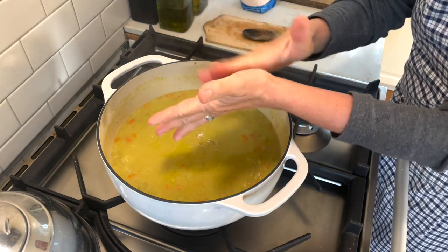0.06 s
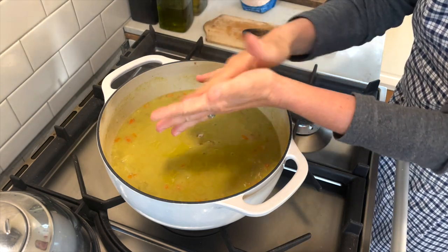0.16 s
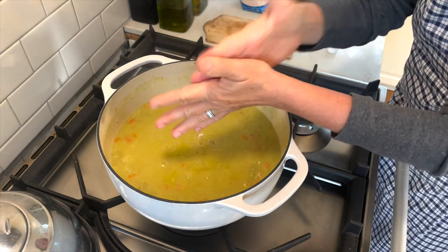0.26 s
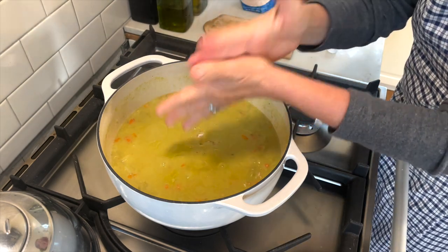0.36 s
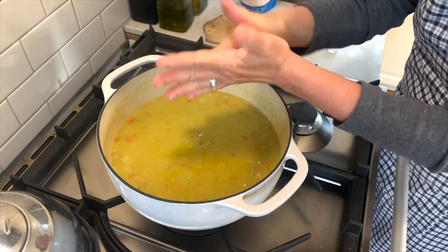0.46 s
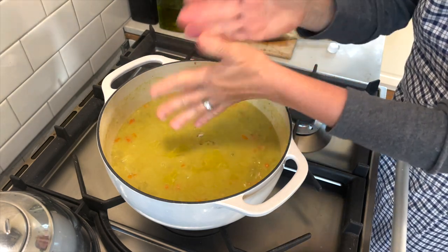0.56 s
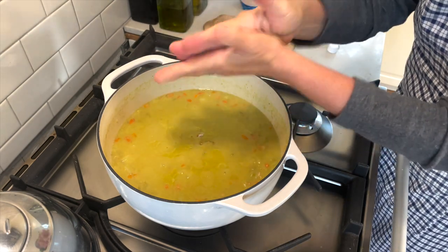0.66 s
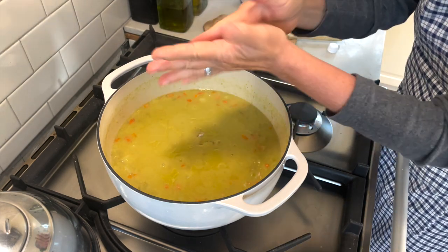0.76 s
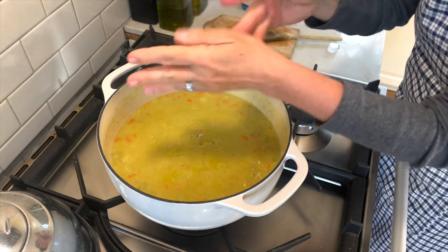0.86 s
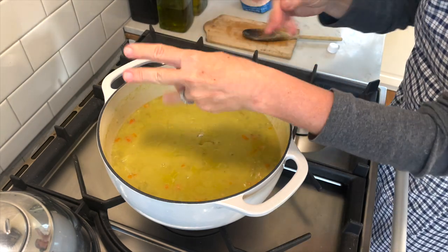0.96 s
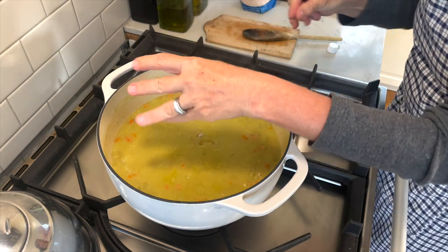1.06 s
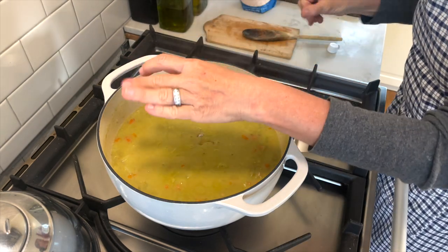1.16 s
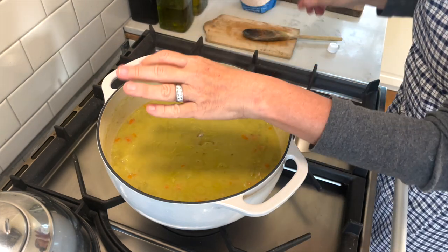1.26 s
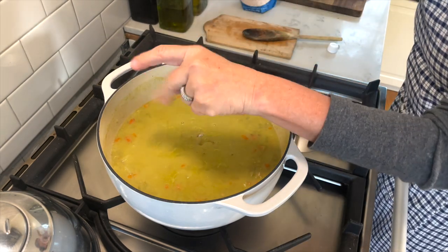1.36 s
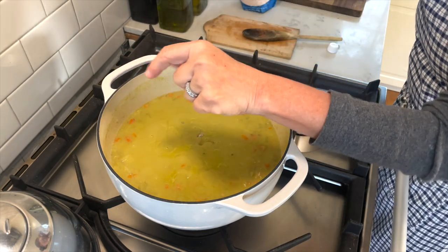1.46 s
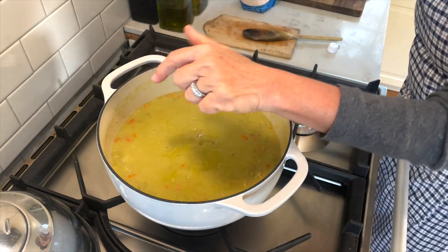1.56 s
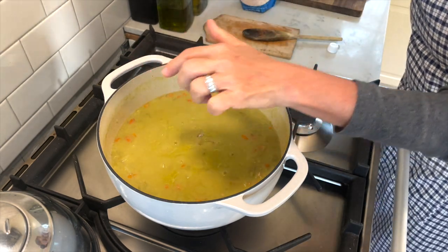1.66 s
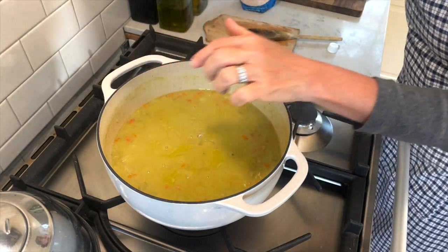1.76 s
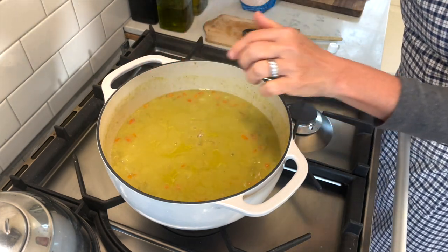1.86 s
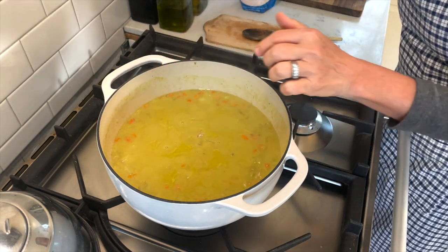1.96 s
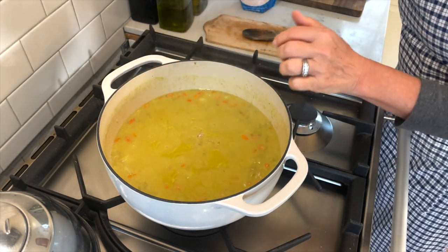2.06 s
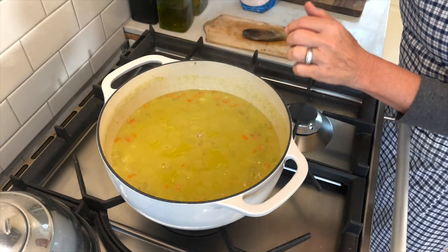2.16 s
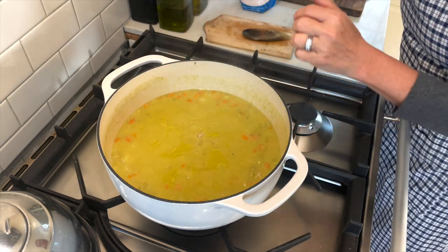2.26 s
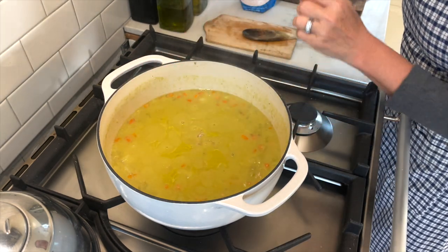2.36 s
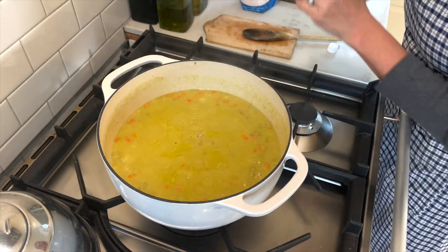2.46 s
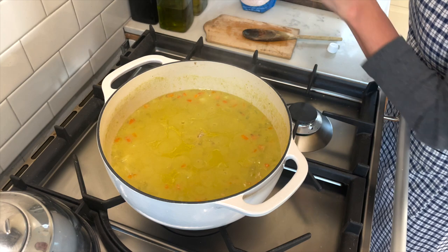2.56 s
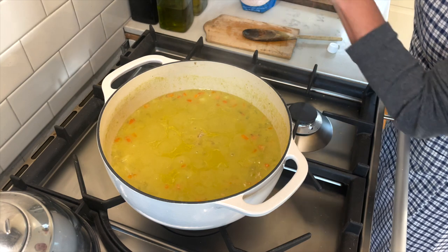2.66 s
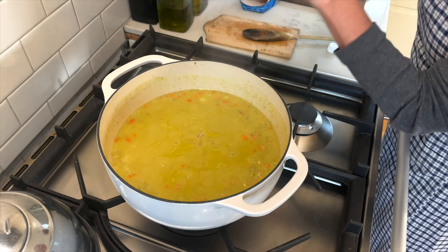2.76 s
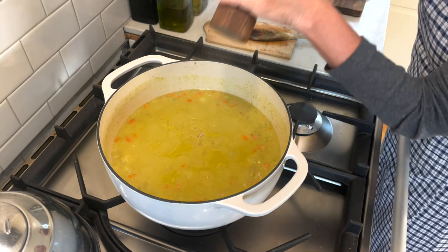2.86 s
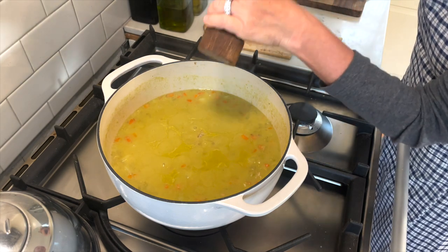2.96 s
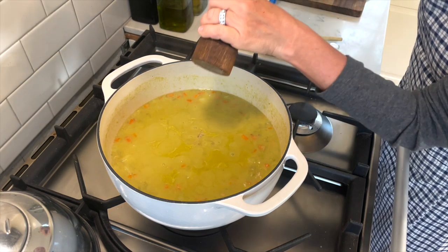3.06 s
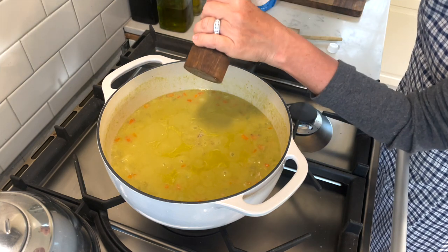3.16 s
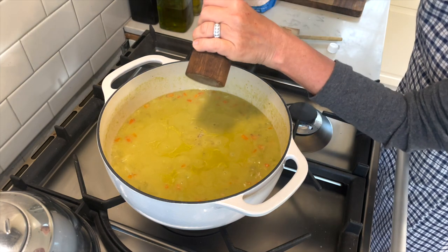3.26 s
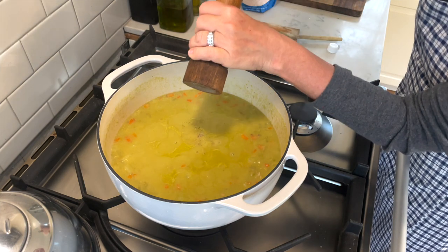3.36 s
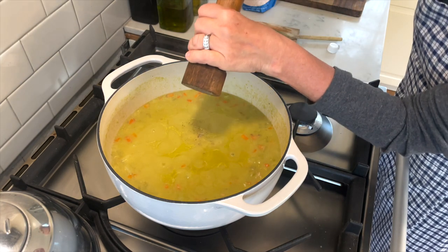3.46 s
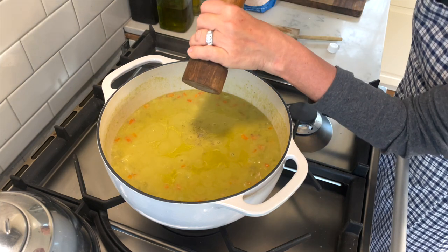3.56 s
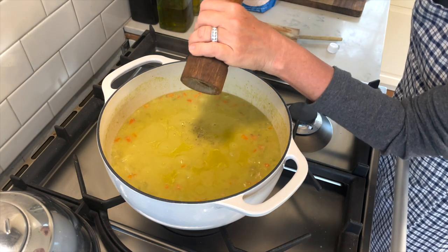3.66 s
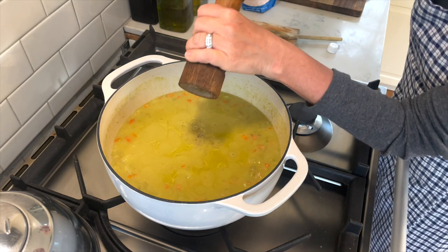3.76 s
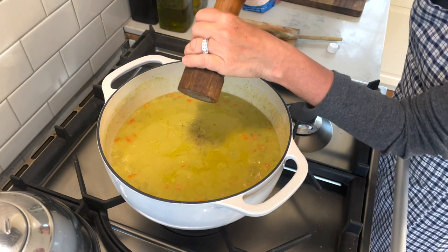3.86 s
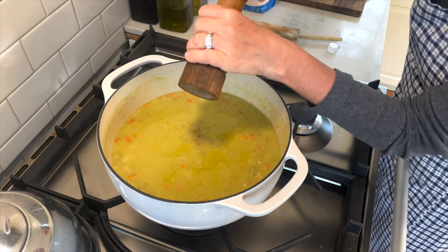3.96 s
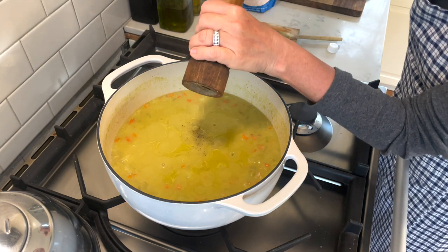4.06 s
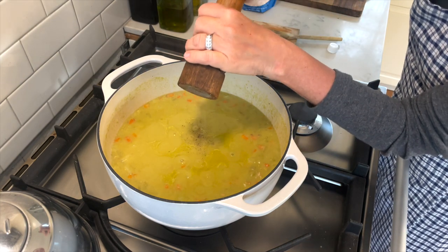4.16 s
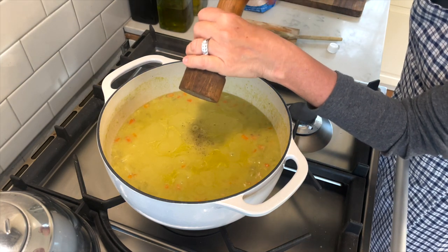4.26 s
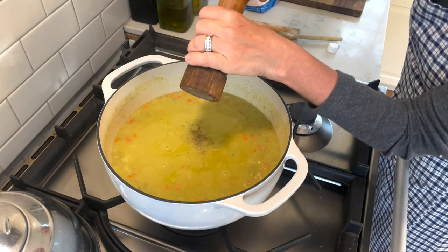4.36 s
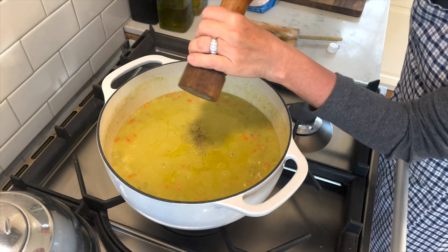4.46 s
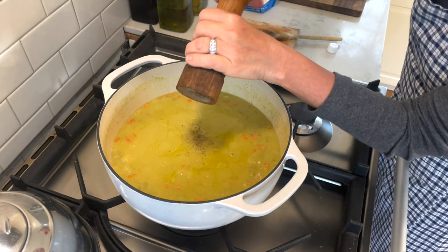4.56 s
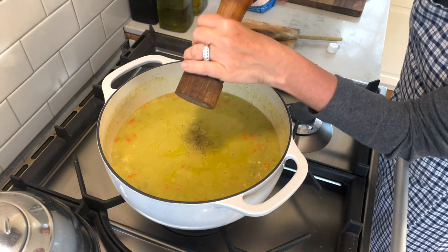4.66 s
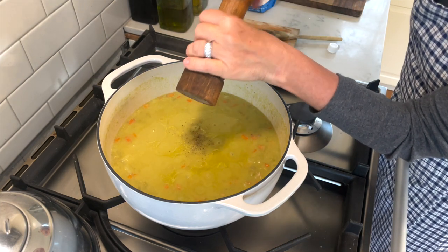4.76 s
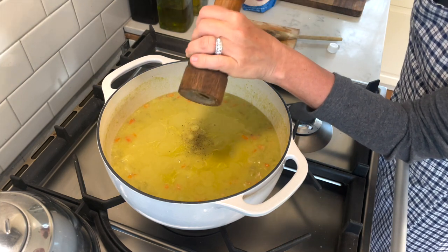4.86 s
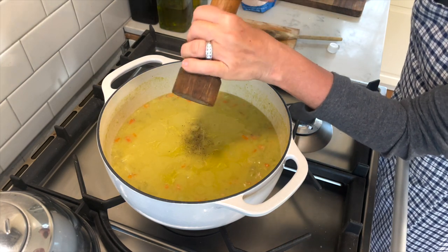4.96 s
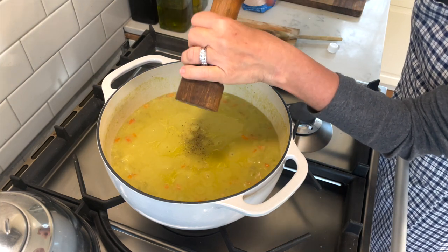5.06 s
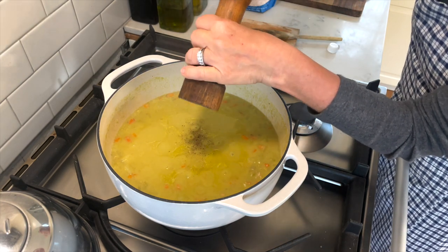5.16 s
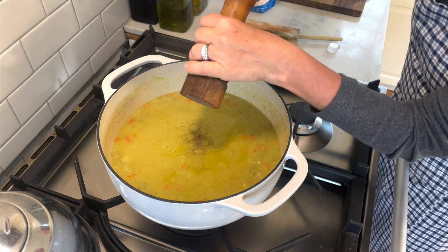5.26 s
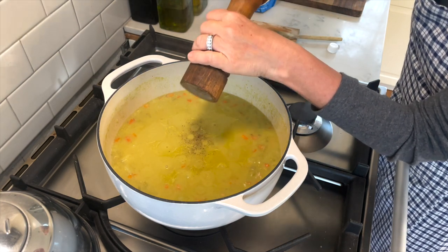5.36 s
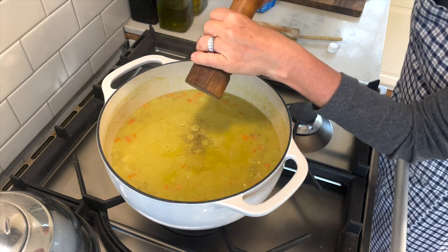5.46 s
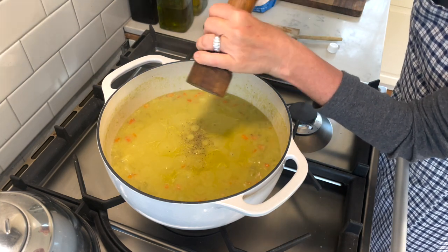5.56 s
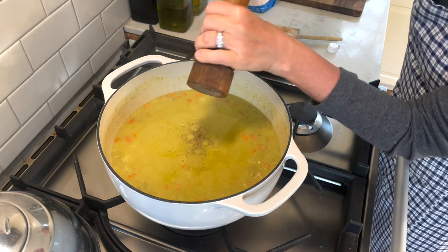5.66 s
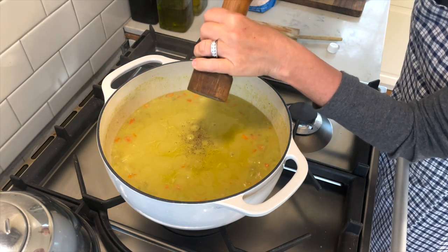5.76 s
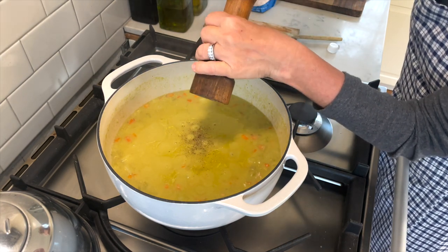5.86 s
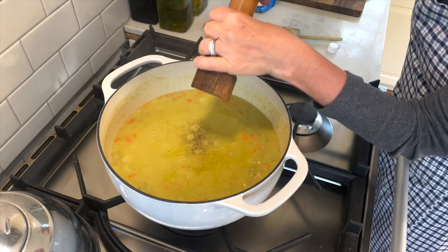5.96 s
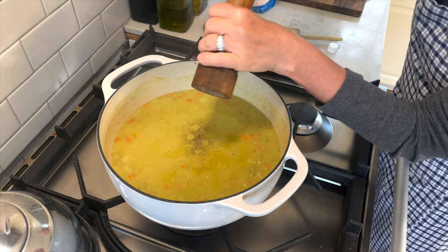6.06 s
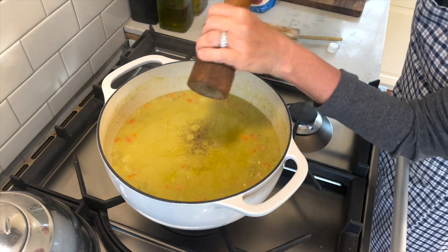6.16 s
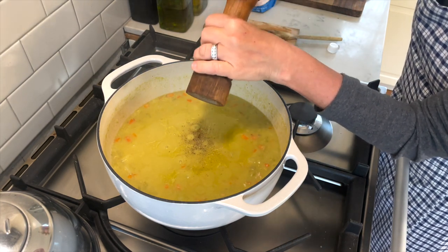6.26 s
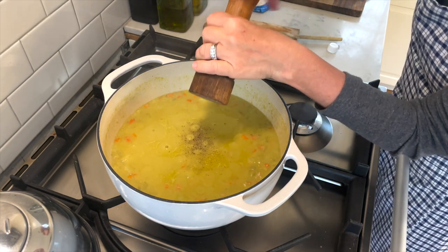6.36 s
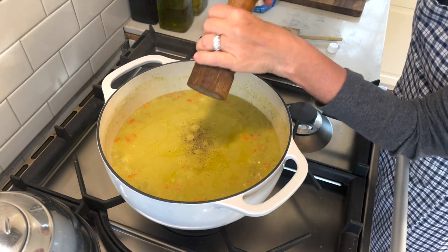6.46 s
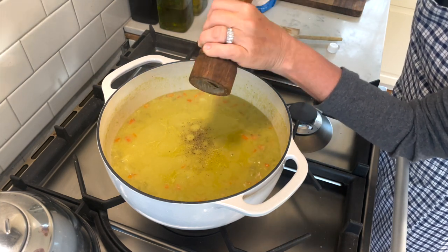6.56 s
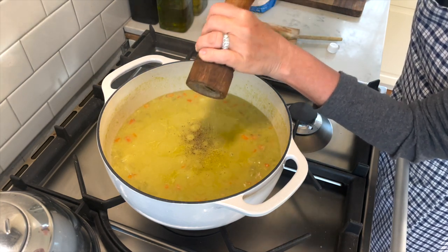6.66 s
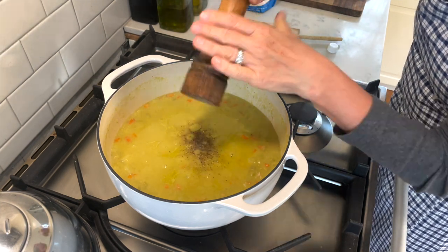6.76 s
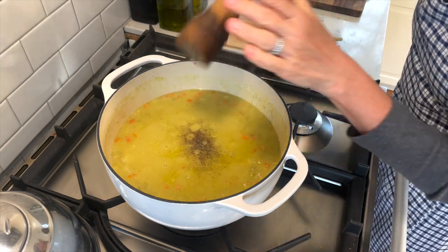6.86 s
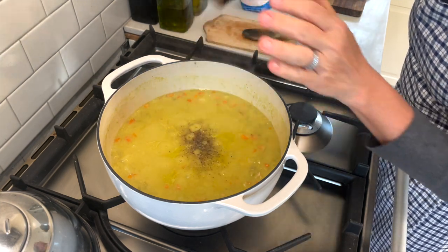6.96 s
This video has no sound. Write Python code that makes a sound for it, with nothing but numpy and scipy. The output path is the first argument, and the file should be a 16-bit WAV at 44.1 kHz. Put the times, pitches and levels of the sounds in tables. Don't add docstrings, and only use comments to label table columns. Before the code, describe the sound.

Hands rub off salt over a pot with quick, dry strokes, then something is set down hard and a few loose things rattle. After a brief lull, a wooden grinder starts: separate short twists, each begun by a clack and filled with crisp cracks and coarse crunching. Tiny ticks come from the pot. The small tiled kitchen adds a bright, short echo over quiet hum and hiss, heard fairly close on a small camera microphone.

```python
import sys
import numpy as np
from scipy import signal
from scipy.fft import rfft, irfft, next_fast_len
from scipy.io import wavfile
from scipy.ndimage import uniform_filter1d

SR = 44100
rng = np.random.default_rng(int(sys.argv[2]) if len(sys.argv) > 2 else 0)


def wrap_up_sound(samples):
    columns = np.atleast_2d(samples).T
    tamed = np.clip(columns, -1, 1)
    steps = np.round(tamed * 32767).astype(np.int16)
    wavfile.write(sys.argv[1], SR, steps)


def invert_db(level):
    return 10 ** (np.asarray(level, dtype=float) / 20)


N = 308259
TIME = np.arange(N) / SR
SIZE = next_fast_len(N + SR)
HZ = np.maximum(np.fft.rfftfreq(SIZE, 1 / SR), 1)
SCENE_CHANGE_S = 6.759

# start in seconds, rise in seconds, hold in seconds, level in dB, brightness in dB.
PALM_STROKES = [(-.02, 0.013, 0.017, -48, 2), (.165, 0.0057, 0.062, -45, -4.5),
                (.333, 0.0031, .065, -56, 6.5), (.44, 0.028, 0.042, -41, 2.5), (.583, 0.012, 0.032, -49, 8),
                (.714, 0.025, 0.021, -41.5, -1), (.8, 0.016, 0.024, -60, 1), (.85, 0.015, 0.016, -49.5, 2),
                (.9, 0.0088, 0.013, -59.5, 12.5), (1.05, 0.042, 0.17, -66, 4), (2.578, .006, 0.053, -68, 5),
                (2.64, 0.036, .07, -65.5, -0.5)]
# frequency in Hz, level in dB per Hz.
SKIN_COLOUR = [(710, -56), (1200, -34), (1950, -10.5), (2130, -6), (2350, -3.5), (3150, 1), (4220, -10.5),
               (12700, -18.5), (16000, -22)]
# frequency in Hz, level in dB per Hz.
AIR_COLOUR = [(12, -46.5), (20, -7), (63, 2.5), (86, -11), (104, -12), (182, -14), (270, -22), (446, -23),
              (499, -27.5), (718, -27.5), (849, -30), (1220, -31.5), (7520, -44.5), (9670, -47.5),
              (16000, -46.5)]
# frequency in Hz, level in dB.
FRIDGE_HUM = [(43, -65.5), (60, -57), (120, -84), (148, -70), (180, -67), (300, -74)]
# frequency in Hz, time to fade by 60 dB in seconds.
ECHO_FADE = [(150, 0.32), (1400, 0.47), (3700, 0.43), (9000, 0.33), (16000, 0.17)]
# time in seconds, peak in dB, pitch in Hz.
POT_TICKS = [(0.1271, -49, 5760), (1.4844, -47, 8200), (1.7544, -53, 6430), (1.8894, -57, 6800),
             (1.958, -56, 6800), (2.251, -53, 6200), (2.4339, -53, 5590), (2.5456, -51, 6370),
             (2.6404, -51, 6600), (2.6773, -54, 7500), (2.9044, -52, 7790), (3.0046, -66, 6660),
             (4.744, -52, 5400), (4.9525, -45, 11500), (6.0525, -48, 7800), (5.9174, -60, 5840),
             (5.5227, -58, 7000), (6.468, -58, 12000), (2.309, -56, 3200), (2.369, -57, 3400),
             (2.678, -56, 10500), (2.686, -58, 8000), (3.994, -52, 10500)]
# time in seconds, peak in dB, body relative to the peak
# in dB, treble relative to the peak in dB, length in seconds.
HOB_KNOCKS = [(0.165, -25.5, -4, -30, 0.0021), (0.389, -42.5, -9, 2, 0.0023),
              (0.4693, -39, -2, -12, 0.0023), (0.6994, -42, -5, -5, 0.003), (0.733, -40, -5, -6, 0.0049),
              (1.5345, -11, -13.5, -21.5, 0.0033), (1.5474, -35, -11, -27, 0.0025),
              (1.568, -22, -9, -27, 0.009), (1.602, -27, -13, -30, 0.0032), (1.949, -55.5, 15, -11, 0.0017),
              (2.037, -55, -8, 4, 0.0023), (2.129, -32, 1, -24, 0.0013), (2.587, -49.5, -12, -12, 0.0038),
              (2.7771, -17.5, -5, -10.5, 0.00056), (2.904, -41, -3, -22, 0.0027),
              (3.015, -42.5, -6, -9, 0.0035), (3.065, -44, -8, -16, 0.0049), (0.158, -42, -11, -17, 0.0055),
              (4.363, -40, -0.5, -16, 0.0038), (5.08, -41.5, -4, -25, 0.0048),
              (4.665, -44, 9.5, -20, 0.0051)]
# frequency in Hz, level in dB per Hz.
WOOD_COLOUR = [(120, -46), (200, -9), (328, -6.5), (659, -7.5), (806, -3), (1230, -5), (1350, -4.5),
               (3370, -3), (4270, -15.5), (8120, -28), (16000, -48.5)]
RATTLE_TIMES = [.167, 1.949, 2.035, 2.048, 2.131, 2.777, 4.05, 4.838]
# pitch in Hz, width in Hz, level in dB,
# time to fade by 60 dB in seconds.
RATTLING_THINGS = [
    [(560, 410, -43, 0.071)],
    [(370.37, 190, -47, 0.13)],
    [(4540, 660, -53.5, .06), (600, 350, -55, 0.11)],
    [(7240, 900, -57, .05), (1760, 700, -58, 0.36), (3500, 650, -60.5, 0.22)],
    [(860, 470, -38, 0.031), (1800, 1500, -50.5, 0.22), (3760, 400, -53, 0.24)],
    [(1410, 1800, -41, 0.058), (3200, 150, -54, 0.2), (4660, 700, -47, 0.2), (6500, 1600, -47, 0.19),
     (7800, 320, -44, 0.082)],
    [(320, 130, -42.5, 0.52)],
    [(319, 320, -38, 0.17)],
]
# time in seconds, peak in dB, pitch in Hz,
# time to fade by 60 dB in seconds.
RINGING_PARTS = [(.167, -43, 690, 0.097), (2.131, -49, 784, 0.032), (2.777, -40, 1034, 0.05),
                 (2.777, -41, 2118, 0.058), (2.779, -46, 3200, 0.17), (2.779, -44, 3130, 0.17),
                 (2.778, -46, 4140, .08), (2.778, -57, 4580, .3), (3.259, -48, 11300, .03),
                 (3.274, -50, 11500, .03), (3.705, -39, 8000, .035), (3.733, -49, 14700, .04),
                 (4.154, -37, 8030, .025), (4.244, -49.5, 7470, .05), (4.477, -25, 8700, 0.018),
                 (5.549, -32, 11600, 0.013), (2.7772, -27, 1500, .012), (2.778, -42.5, 578, 0.089),
                 (2.779, -54, 7700, 0.28), (.168, -48, 560, .1), (6.1135, -35, 14600, .06),
                 (4.03, -46, 5500, .1), (2.779, -52, 13000, .02), (2.903, -64, 10300, .06),
                 (5.16, -60, 4500, .035)]
# (frequency in Hz, width in Hz, change in dB).
GRIP_RESONANCES = [(1.53, [(2380, 270, -2), (3250, 480, 1.5), (3750, 250, -7), (4830, 500, 2)]), (1.9, []),
                   (3.08, [(350, 180, 2), (1700, 280, 3), (4440, 1000, -1.5), (6700, 720, -1),
                   (11200, 1500, 2.5)]), (3.55, [(1900, 400, -3), (2450, 260, 6.5), (3700, 350, -4)]),
                   (3.635, [(800, 300, -4), (1150, 300, 3), (7500, 600, -2), (11300, 1600, -4),
                   (8060, 370, 1)]), (3.97, [(2000, 800, 2), (760, 300, -4.5), (3100, 300, -3.5),
                   (6840, 1200, -2.5), (13200, 1500, 2.5)]), (4.38, [(8400, 800, 2.5), (5200, 900, -4)]),
                   (4.472, [(1700, 400, -2.5), (5000, 300, 4.5), (4640, 1400, 3), (6600, 1400, -4),
                   (9000, 700, 4.5), (13000, 4000, -2.5)]), (4.79, [(2780, 600, -2.5), (1920, 250, 1),
                   (5240, 800, 2.5), (7800, 830, 0), (10400, 1000, 3)]), (5.24, [(2700, 900, 1),
                   (5280, 1200, -7.5), (7600, 2200, 3.5), (12000, 5000, -8)]), (5.54, [(1990, 1000, 6),
                   (3100, 510, -11)]), (5.605, [(1080, 190, 1), (2200, 450, -2), (2970, 600, 4),
                   (7700, 1200, 6.5), (9300, 600, -6), (12200, 1500, -1.5)]), (5.99, [(1460, 210, 2.5),
                   (4850, 1300, 2.5), (12000, 900, -5), (14600, 700, 5)]), (6.5, [(1800, 300, 4),
                   (3500, 450, 3.5), (2260, 710, -2.5), (4400, 900, -2), (780, 300, -1.5),
                   (9450, 600, -5)]), (6.77, [(4750, 600, 5.5), (3200, 900, 0.5), (9050, 2000, 1)])]
# frequency in Hz, level in dB, time to fade by 60 dB in seconds.
COUNTER_MODES = [(118, -31.5, 0.22), (154, -39.5, 0.38), (319.5, -35, 0.24), (357, -44.5, 0.5),
                 (793, -28.5, 0.092)]
# start in seconds, rise in seconds, hold in seconds, level in dB,
# brightness in dB.
CLOTH_STROKES = [
    (1.538, 0.003, 0.029, -34.5, 1.5),
    (2.03, 0.0075, 0.037, -54.5, 0),
    (2.126, .006, 0.047, -60, 3),
    (2.778, 0.0021, 0.0041, -57, 1),
    (2.85, .04, 0.055, -61, 2),
]
# time in seconds, peak in dB.
HUSK_SHARDS = [(1.5385, -20), (1.5425, -22), (1.594, -28), (4.021, -26), (4.077, -20), (4.095, -21),
               (4.103, -21), (4.112, -22), (4.481, -10), (4.507, -17), (4.512, -17), (4.56, -20),
               (5.68, -17), (5.716, -18), (6.531, -14), (6.589, -18), (6.606, -19), (6.646, -18),
               (6.099, -17), (6.216, -20), (4.832, -30)]
# frequency in Hz, level in dB per Hz.
MILL_COLOUR = [(88, -50.5), (150, -20.5), (315, -7), (475, -9.5), (774, -4), (1080, -3.5), (1310, -4.5),
               (1760, 1.5), (2100, 0), (3350, 0.5), (5150, -13), (6640, -20), (8070, -24), (14200, -30.5),
               (16000, -45.5)]
# frequency in Hz, width in Hz, gain in dB.
BURR_RESONANCES = [(1700, 98, 1), (2880, 190, 3), (3660, 210, -0.5), (3880, 28, 0), (5140, 1300, 5),
                   (8200, 740, 4.5), (11000, 1400, 4.5), (14600, 600, 3)]
# start in seconds, rise in seconds,
# hold in seconds, level in dB, brightness in dB.
SLACK_STROKES = [(3.087, 0.0063, 0.071, -40.5, 1), (3.563, 0.0028, 0.074, -45.5, -7),
                 (3.978, .003, 0.023, -44, -3), (4.385, 0.0077, 0.061, -39, 0.5),
                 (4.795, 0.0044, 0.016, -45, -13), (5.549, 0.0028, 0.02, -27.5, -2.5),
                 (6.004, 0.0024, 0.023, -50, -1), (6.528, 0.0017, 0.02, -29, -2),
                 (6.783, 0.012, 0.0073, -48.5, 16.5), (6.84, 0.0055, 0.035, -63, 1)]
# time in seconds, peak in dB, body relative to the
# peak in dB, grit relative to the peak in dB.
CAP_CLACKS = [(3.088, -45, 2.5, -18), (3.5637, -31.5, -14, -5.5), (3.9765, -42, -29, -28),
              (4.3935, -42, -1, -15.5), (4.7955, -40, -7, -10), (5.2482, -37, -3.5, -14),
              (5.5493, -25, -20, -5.5), (6.0045, -29.5, -12, -11.5), (6.5287, -13.5, -8, -4),
              (6.7844, -50, 8, 0)]
# start in seconds, rise in seconds, hold in seconds, crunch in dB,
# brightness in dB.
MILL_TWISTS = [
    (3.183, 0.025, 0.16, -29, -0.5),
    (3.605, 0.067, 0.075, -25.5, 2.5),
    (4.01, 0.063, 0.06, -24, 0),
    (4.466, 0.01, 0.082, -24.5, 2),
    (4.826, 0.018, 0.0083, -26.5, 0),
    (5.268, 0.002, 0.0034, -48, 0.5),
    (5.61, 0.036, 0.055, -25.5, 1),
    (6.072, 0.036, 0.088, -23, 1),
    (6.54, 0.052, 0.061, -25.5, -0.5),
]
# time in seconds, peak in dB, body relative to the peak in dB,
# grit relative to the peak in dB.
CORN_SNAPS = [(3.1896, -33, -22.5, -15), (3.2095, -27.5, -35, -20), (3.2579, -34.5, 9, -3),
              (3.6165, -39, -2, -19), (3.7014, -20, -35, -15), (3.7212, -16.5, -12, -23),
              (3.7422, -17, -12, -11), (4.0214, -34, -18, -18), (4.0538, -34, 10, 2.5),
              (4.154, -30, -31, 0.5), (4.2444, -29.5, -5, -15), (4.4213, -25.5, -7, -19),
              (4.4604, -21, -9, -22), (4.4772, -7.5, -13, -8.5), (4.4974, -26, -22, -29),
              (4.835, -18.5, -9, -24), (4.8454, -22, -0.5, -13.5), (5.2728, -32.5, -12, -8),
              (5.362, -54, -17, 0.5), (5.679, -24, -20, -20), (5.7036, -15, -12.5, -29),
              (6.0372, -30.5, -9.5, -14), (6.1075, -17, -17, -13), (6.1136, -16, -3.5, -9.5),
              (6.1538, -17.5, -6.5, -12), (6.1914, -16, -11.5, -7.5), (6.447, -55, -2, 3),
              (6.5849, -23, -6, -14), (6.6026, -19.5, -18, -18), (6.8412, -42, -9.5, -8)]
# time in seconds, peak in dB, body relative to the peak in dB,
# grit relative to the peak in dB.
SMALL_CRACKS = [(3.1167, -37, -4, -6), (3.2736, -25, -14, -16), (3.6263, -27, -6, -21),
                (3.6509, -18, -22, -17), (3.7332, -14, -10, -14), (3.793, -22.5, -26, -28),
                (3.8074, -26, -20, -26), (3.9787, -43, -16, -25), (4.0247, -37, -12, -18),
                (4.0604, -16, -12, -13), (4.1725, -24, -18, -24), (4.1816, -29, -11, -18),
                (4.218, -34, -9, -25), (4.3895, -41, -12, -19), (4.396, -35, -18, -19),
                (4.49, -15, -18, -22), (4.4979, -14, -22.5, -19), (4.5384, -26, -20, -9),
                (4.7968, -34, -12.5, -5), (4.8016, -41, -10.5, -14), (4.8408, -19, -16.5, -18),
                (4.8735, -25, -9.5, -19), (5.2488, -40, -13, -14), (5.2741, -38, -18, -10),
                (5.5552, -20.5, 0, -16), (5.6126, -27, -15, -13), (5.6497, -22, -11, -7),
                (5.655, -21, -16, -13), (5.6596, -13, -15, -19), (5.7097, -18, -8, -24),
                (5.715, -22, -18, -25), (5.727, -21, -21, -26), (5.7445, -22, -31, -23),
                (5.7636, -25, -17, -23), (5.8334, -39, -18, -27), (6.015, -44, -26, -25),
                (6.1267, -24, -19, -18), (6.1448, -16, -13, -22), (6.1593, -13, -15, -17),
                (6.1703, -25, -18, -19), (6.2117, -21, -16, -22), (6.2547, -25, -9, -27),
                (6.262, -38, -14, -21), (6.5347, -23, -5, -12), (6.5615, -21, -15, -17),
                (6.6383, -12.5, -22, -17), (6.6887, -28, -27, -26), (6.72, -31, -15, -29)]
# start in seconds, rise in seconds, hold in seconds, level in dB,
# brightness in dB.
DUST_PUFFS = [(4.555, .006, .006, -46, 0), (4.915, .008, .01, -59, 0), (4.998, .008, .012, -61, 0),
              (5.052, 0.0089, .018, -63, 0), (5.76, 0.0033, 0.0056, -55, 0.5),
              (6.638, .003, 0.0087, -54, 0), (6.795, .003, 0.0066, -49, 0), (3.33, .005, 0.0091, -55, 0)]
# frequency in Hz, level in dB.
POWDER_COLOUR = [(5000, -38), (8500, -9), (10500, -2.5), (13000, 0), (16000, -1.5)]

# swell in dB, sag in dB per second, release in dB per second.
PALM_MOTION, CLOTH_MOTION = (15.6, 85, 440), (5.7, 54, 280)
SLACK_MOTION, TWIST_MOTION = (17, 20, 660), (16.4, 21.7, 310)
DUST_MOTION = (10, 30, 2600)
THINNING = 0.82
CRACK_DB = -5.5


def unit(x):
    return x / np.sqrt(np.mean(x ** 2))


def unit_response(response):
    return response / np.sqrt(np.mean(abs(response) ** 2))


def shape(table):
    hz, value = np.transpose(table)
    return np.interp(np.log(HZ), np.log(hz), value)


def causal(db):
    cepstrum = irfft(db * np.log(10) / 20, SIZE)
    cepstrum[1:SIZE // 2] *= 2
    cepstrum[SIZE // 2 + 1:] = 0
    return np.exp(rfft(cepstrum))


def through(x, response):
    return irfft(rfft(x, SIZE) * response, SIZE)[:N]


def peak(hz, width_hz):
    return 1 / (1 + (2 * (HZ - hz) / width_hz) ** 2)


def body_parts(colour_db, low_hz, high_hz):
    low = 1 / (1 + (HZ / low_hz) ** 6)
    high = 1 / (1 + (high_hz / HZ) ** 10)
    shares = (1 - low - high, low, high)
    return [unit_response(causal(colour_db + 10 * np.log10(share + 1e-6))) for share in shares]


def feed(drive, gain, parts):
    return sum(through(drive * g, part) for g, part in zip(gain, parts))


def walk(rate):
    k = int(SR / rate)
    steps = np.repeat(rng.standard_normal(N // k + 1), k)
    return unit(uniform_filter1d(uniform_filter1d(steps, k), k)[:N])


def stroke_gains(strokes, motion, *parts_db):
    swell_db, sag_db_s, release_db_s = motion
    out = np.zeros((1 + len(parts_db), N))
    for start_s, rise_s, hold_s, db, bright_db in strokes:
        first = int(start_s * SR)
        span = slice(max(first, 0), first + 3 * SR // 4)
        age = TIME[span] - start_s
        rise_s = max(rise_s, .001)
        swell = swell_db * np.clip(1 - age / rise_s, 0, 1)
        sag = sag_db_s * np.clip(age - rise_s, 0, hold_s)
        release = release_db_s * np.maximum(age - rise_s - hold_s, 0)
        strength = (age > 0) * invert_db(db - swell - sag - release)
        balance = invert_db([0] + [part_db + share * bright_db for part_db, share in parts_db])
        out[:, span] += np.outer(balance, strength)
    return out


def grains(per_s, spread_db, length_s, smooth):
    happens = rng.random(N) < per_s / SR
    size = happens * invert_db(np.minimum(spread_db * rng.exponential(size=N), 15))
    burst = signal.lfilter([1], [1, -np.exp(-1 / (length_s * SR))], size)
    return unit((unit(burst) + smooth) * rng.standard_normal(N))


def bursts(events, parts):
    drive = np.zeros((3, N))
    age = TIME[:2048]
    for s, db, low_db, high_db, length_s in events:
        attack = np.minimum(age / (.3 * length_s), 1)
        decay = np.exp(-age / np.clip(length_s, .0005, .01))
        spectrum = rfft(rng.standard_normal(2048) * attack * decay)
        even = spectrum / np.sqrt(uniform_filter1d(abs(spectrum) ** 2, size=24))
        crack = irfft(even) * np.sqrt(length_s * SR / 2)
        strength = invert_db(db + np.array([[0], [low_db], [high_db]]))
        drive[:, int(s * SR):][:, :2048] += strength * crack
    return feed(0.89, drive, parts)


def palms():
    hollow_db = 3.2 * peak(3350, width_hz=360)
    middle, _, high = body_parts(shape(SKIN_COLOUR) + hollow_db, low_hz=1000, high_hz=4940)
    salt = grains(per_s=1300, spread_db=-5.0, length_s=0.0015, smooth=1.0)
    strokes = stroke_gains(PALM_STROKES, PALM_MOTION, (0, 1))
    return invert_db(-5.0) * feed(salt, strokes, (middle, high))


def wavering_tone(hz, db, waver_db):
    return invert_db(db + waver_db * walk(2.7)) * np.sqrt(2) * np.sin(2 * np.pi * hz * TIME)


def narrow_noise(response):
    return unit(through(rng.standard_normal(N), response))


def background():
    mic_db = 5.7 * peak(3220, width_hz=800)
    middle, low, _ = body_parts(shape(AIR_COLOUR) + mic_db, low_hz=280, high_hz=18000)
    rumble = through(rng.standard_normal(N), low) * invert_db(-53.5 + 0.59 * walk(9.6))
    hiss = through(rng.standard_normal(N), middle) * invert_db(-60.5 + 1.1 * walk(5.9))
    hum = sum(wavering_tone(hz, db, 1.35) for hz, db in FRIDGE_HUM)
    fan = wavering_tone(75.5, -56 - 9 * (TIME > 1.4), 0.53)
    open_valve = np.clip(np.minimum(TIME - 1.34, 1.5 - TIME) / 0.017, 0, 1)
    whistle = invert_db(-72) * open_valve * narrow_noise(peak(9900, width_hz=1500) ** 2)
    drone = invert_db(-54.5) * (TIME > SCENE_CHANGE_S) * narrow_noise(peak(146.6, width_hz=11))
    return rumble + hiss + hum + fan + whistle + drone


def echo():
    age = TIME[:SR // 2 + SR // 4]
    sparse = invert_db(2.84 * np.exp(-age / 0.082) * rng.standard_normal(len(age)))
    ring_db = 4.6 * peak(3640, width_hz=790)
    noise = rfft(sparse * rng.standard_normal(len(age)), SIZE) * invert_db(ring_db)
    tail = 0
    for k, (_, t60) in enumerate(ECHO_FADE):
        share = shape([(hz, 1. * (j == k)) for j, (hz, _) in enumerate(ECHO_FADE)])
        tail = tail + irfft(noise * share, SIZE)[:len(age)] * 1000. ** (-age / t60)
    tail = tail * np.clip((age - .0015) / 0.00052, 0, 1)
    return rfft(tail / np.sqrt(np.sum(tail ** 2)), SIZE)


def kitchen(dry, echoes):
    turn = 2 * np.pi * 1.5 * TIME
    first = through(dry * np.cos(turn), echoes[0])
    second = through(dry * np.sin(turn), echoes[1])
    return dry + invert_db(-3.5) * (first + second)


def ticks():
    out, age = np.zeros(N), TIME[:400]
    for s, db, hz in POT_TICKS:
        out[int(s * SR):][:400] += invert_db(db) * np.sin(2 * np.pi * hz * age) * np.exp(-age * hz / 3.6)
    return invert_db(0.5) * out


def woodwork():
    return body_parts(shape(WOOD_COLOUR), low_hz=980, high_hz=7000)


def knocks(wood):
    return invert_db(-5.5) * bursts(HOB_KNOCKS, wood)


def rattles():
    out = np.zeros(N)
    for s, thing in zip(RATTLE_TIMES, RATTLING_THINGS):
        for hz, width_hz, db, t60 in thing:
            fade = (TIME >= s) * 1000. ** (-np.maximum(TIME - s, 0) / t60)
            out += invert_db(db) * narrow_noise(peak(hz, width_hz)) * fade
    return out


def pings():
    out, age = np.zeros(N), TIME[:SR // 4]
    for s, db, hz, t60 in RINGING_PARTS:
        out[int(s * SR):][:len(age)] += invert_db(db) * np.sin(2 * np.pi * hz * age) * 1000. ** (-age / t60)
    return out


def held(x):
    edges = [int(s * SR) for s, _ in GRIP_RESONANCES] + [N]
    out = x.copy()
    for start, end, (_, resonances) in zip(edges, edges[1:], GRIP_RESONANCES):
        for hz, width_hz, db in resonances:
            resonance = signal.lfilter(*signal.iirpeak(hz, hz / width_hz, SR), out[start:end])
            out[start:end] += (invert_db(db) - 1) * resonance
    return out


def boom():
    age = np.maximum(TIME - 1.537, 0)
    swell = np.minimum(age / 0.0051, 1)
    return swell * sum(invert_db(db) * np.sin(2 * np.pi * hz * age) * 1000. ** (-age / t60)
                       for hz, db, t60 in COUNTER_MODES)


def rustle(wood):
    rubbing = grains(per_s=1000, spread_db=-3.0, length_s=0.00084, smooth=0.42)
    strokes = stroke_gains(CLOTH_STROKES, CLOTH_MOTION, (3.5, -THINNING), (-12, 1))
    return invert_db(-7.0) * feed(rubbing, strokes, wood)


def mill_body():
    small_body_db = -10 * np.log10(1 + (220 / HZ) ** 6)
    burrs_db = sum(db * peak(hz, width_hz) for hz, width_hz, db in BURR_RESONANCES)
    return body_parts(shape(MILL_COLOUR) + small_body_db + burrs_db, low_hz=1450, high_hz=6350)


def shards(body):
    body_db, grit_db, length_s = -14, -16, .0012
    return invert_db(CRACK_DB) * bursts([(*row, body_db, grit_db, length_s) for row in HUSK_SHARDS], body)


def bore_ring(force):
    bore = causal(20 * np.log10(peak(3203, width_hz=899) + 1e-3))
    tipping_db = -9 + 7 * (TIME - 7.5)
    return through(force * invert_db(tipping_db + 3.4 * walk(25)), unit_response(bore))


def mill(body):
    stutter = invert_db(2.0 * walk(70))
    crunch = grains(per_s=900, spread_db=1.6, length_s=0.0024, smooth=1.0)
    spitting = grains(per_s=340, spread_db=7.0, length_s=0.0011, smooth=0.35)
    grit = 0.94 * crunch + 0.74 * spitting
    balance = (-4.5, -THINNING), (-15.5, 1)
    strokes = stroke_gains(MILL_TWISTS, TWIST_MOTION, *balance)
    strokes += stroke_gains(SLACK_STROKES, SLACK_MOTION, *balance)
    force = strokes * stutter * [crunch, crunch * invert_db(2.1 * walk(30)), grit]
    grinding = bore_ring(force[0]) + feed(0.92, force, body)
    snaps = bursts([(*row, 0.0036) for row in CAP_CLACKS + CORN_SNAPS], body)
    return invert_db(-4.5) * grinding + invert_db(-0.5) * snaps


def cracks(body):
    return invert_db(CRACK_DB) * bursts([(*row, .002) for row in SMALL_CRACKS], body)


def dust():
    puffs = stroke_gains(DUST_PUFFS, DUST_MOTION)[0] * rng.standard_normal(N)
    return through(puffs, unit_response(causal(shape(POWDER_COLOUR))))


def scene():
    body, wood = mill_body(), woodwork()
    echoes = echo(), echo()
    things = knocks(wood) + rustle(wood) + rattles() + ticks()
    in_hand = held(mill(body) + cracks(body) + things)
    dry = palms() + in_hand + dust() + pings() + shards(body)
    early = TIME < SCENE_CHANGE_S
    before = kitchen(dry * early, echoes) * early
    after = kitchen(dry * ~early, echoes)
    return (before + after + boom() + background())[None]


def band_limit(x):
    return signal.sosfilt(signal.butter(12, 16650, fs=SR, output="sos"), x)


def record(dry):
    top_cut = signal.ellip(6, .2, 30, 15900, fs=SR, output="sos")
    return band_limit(signal.sosfilt(top_cut, dry))


dry = scene()
out = record(dry)
wrap_up_sound(out)
```